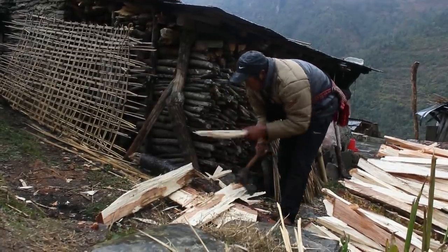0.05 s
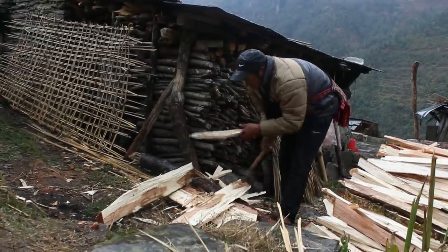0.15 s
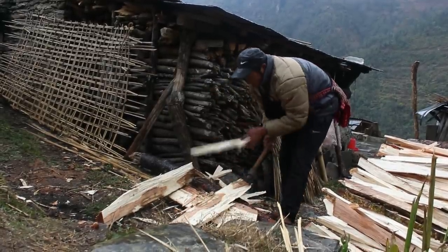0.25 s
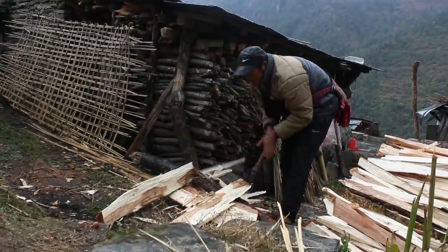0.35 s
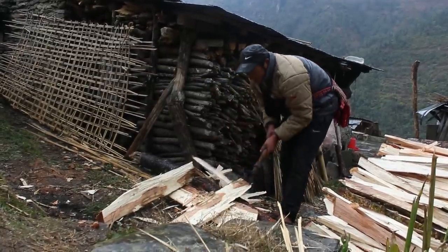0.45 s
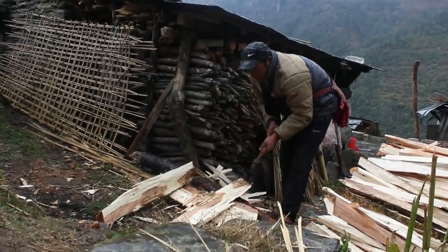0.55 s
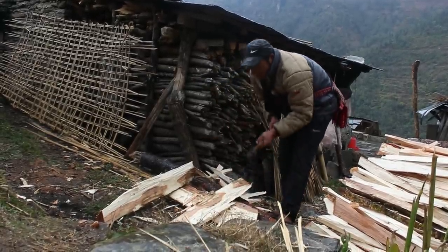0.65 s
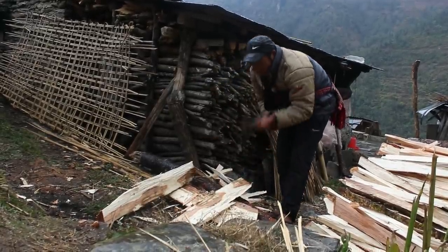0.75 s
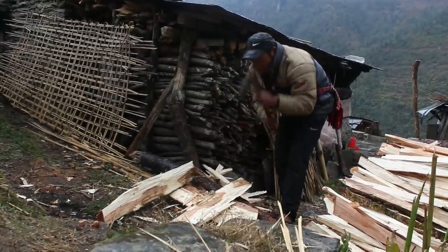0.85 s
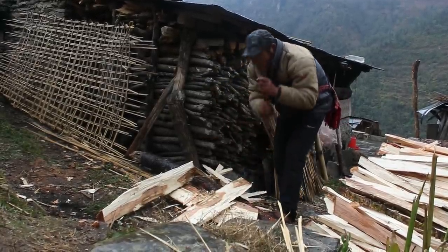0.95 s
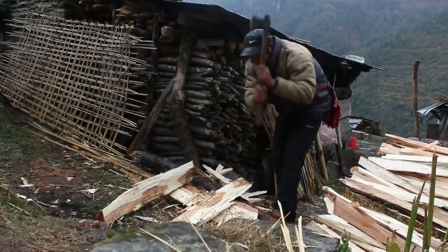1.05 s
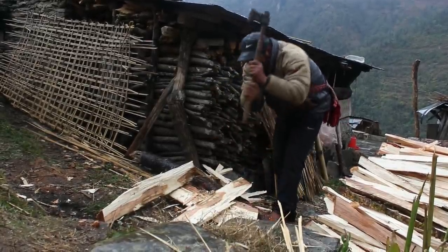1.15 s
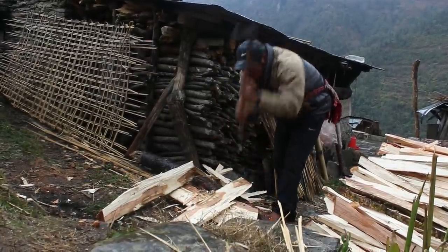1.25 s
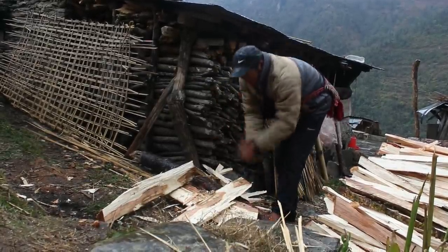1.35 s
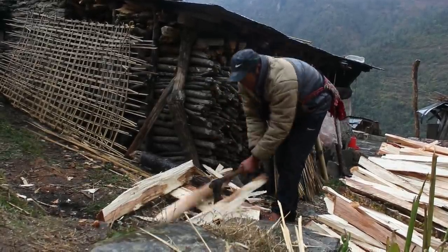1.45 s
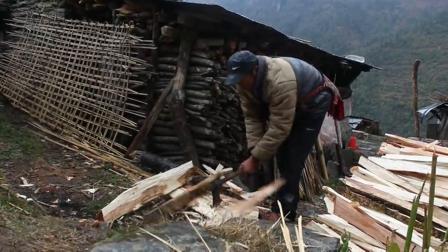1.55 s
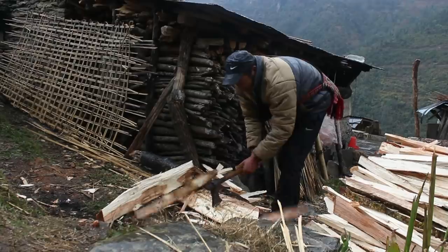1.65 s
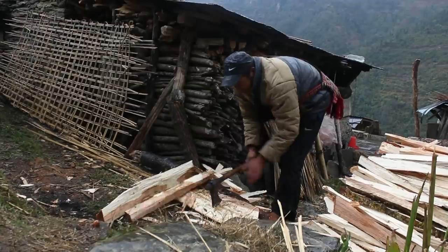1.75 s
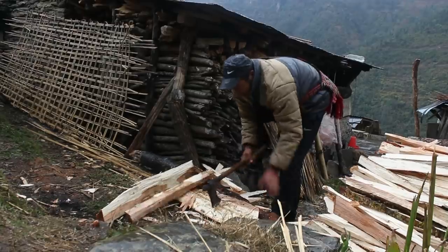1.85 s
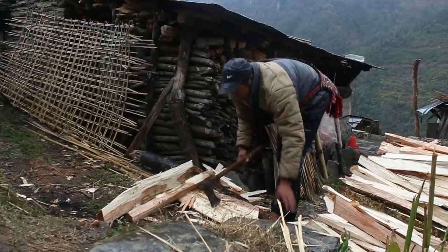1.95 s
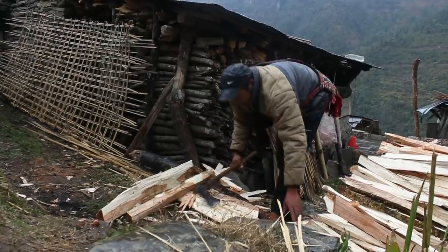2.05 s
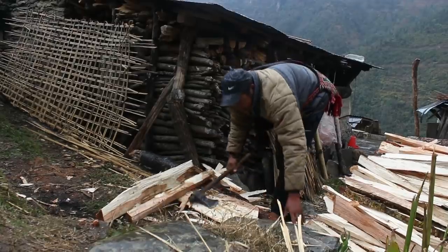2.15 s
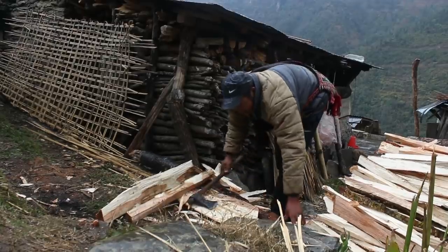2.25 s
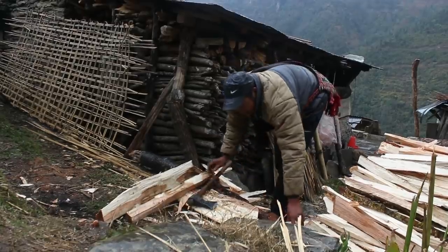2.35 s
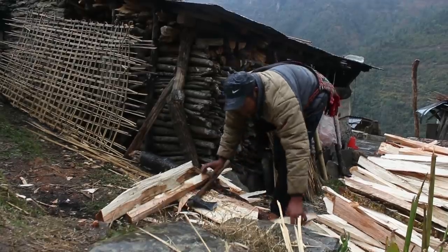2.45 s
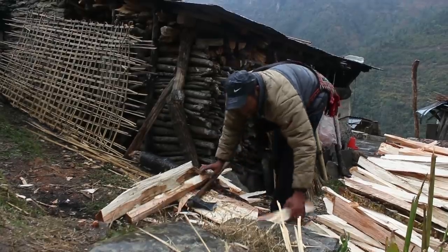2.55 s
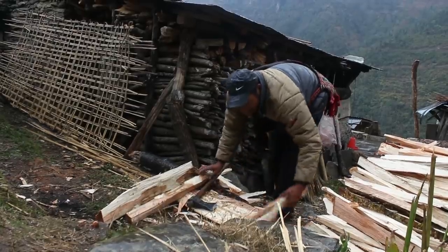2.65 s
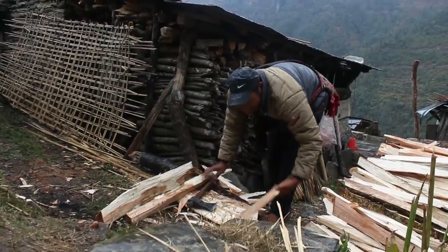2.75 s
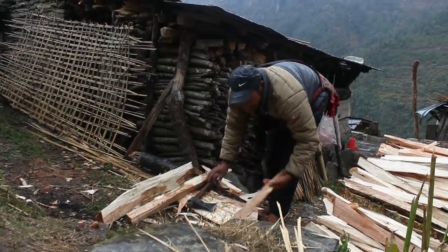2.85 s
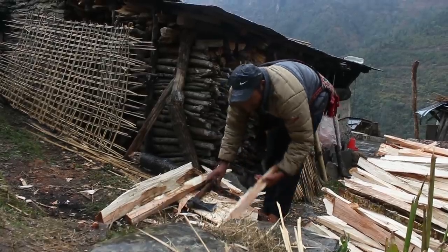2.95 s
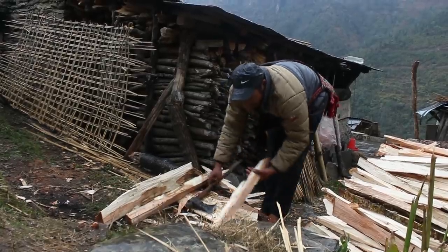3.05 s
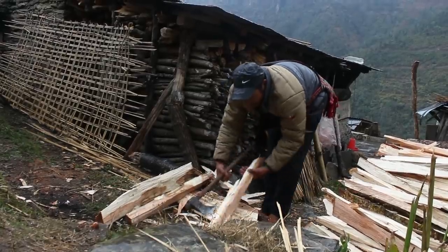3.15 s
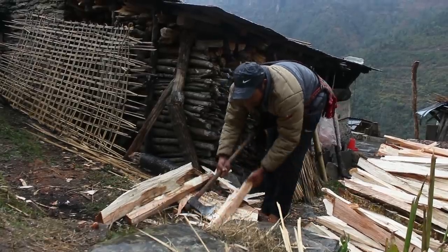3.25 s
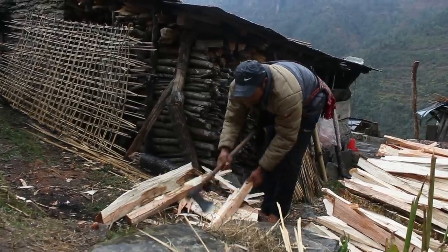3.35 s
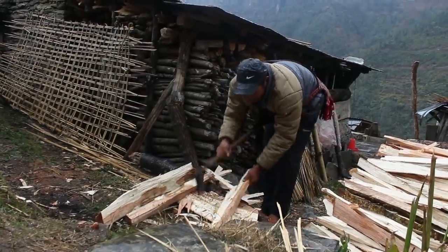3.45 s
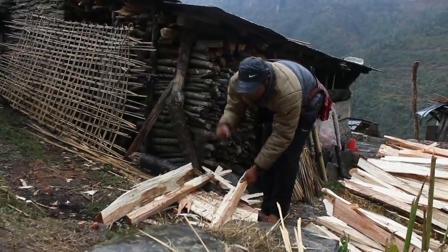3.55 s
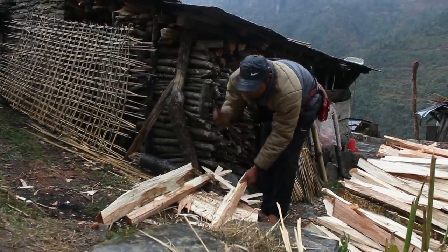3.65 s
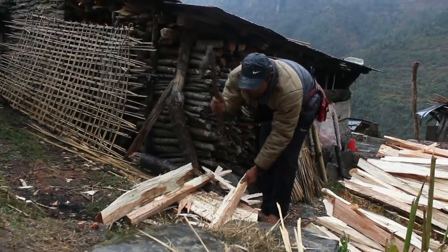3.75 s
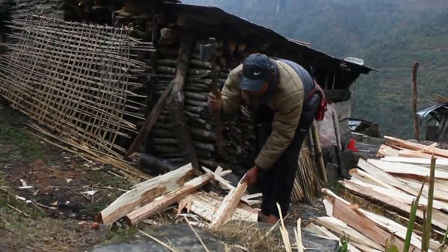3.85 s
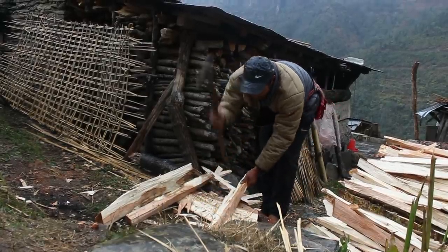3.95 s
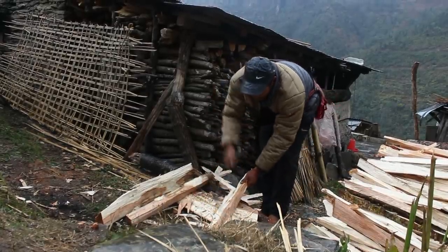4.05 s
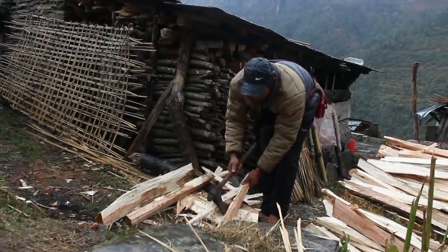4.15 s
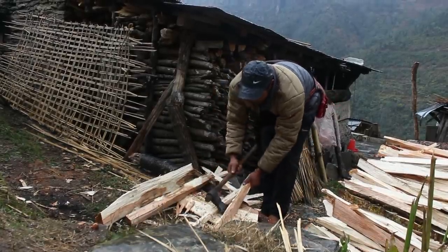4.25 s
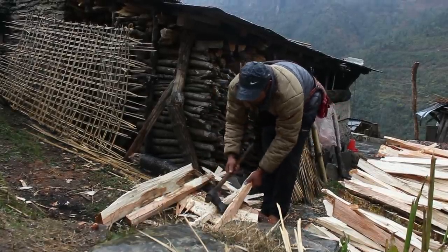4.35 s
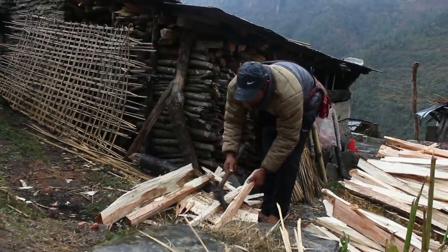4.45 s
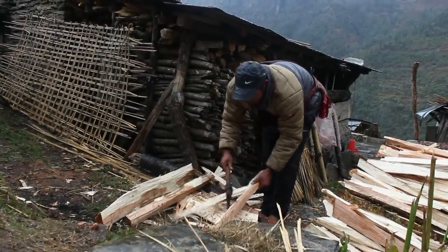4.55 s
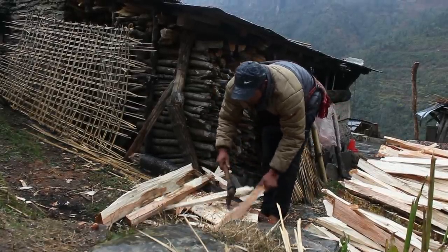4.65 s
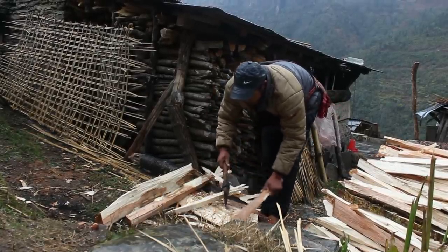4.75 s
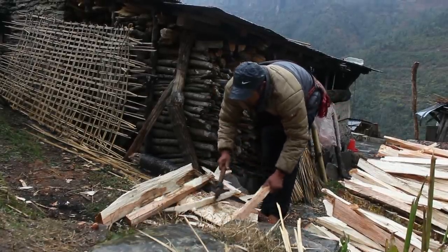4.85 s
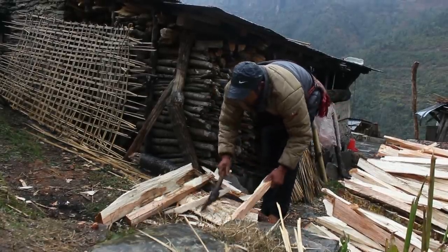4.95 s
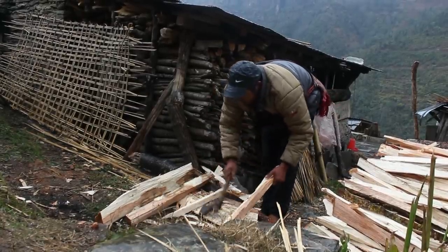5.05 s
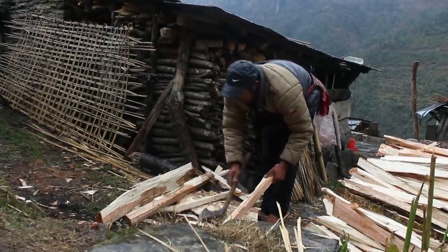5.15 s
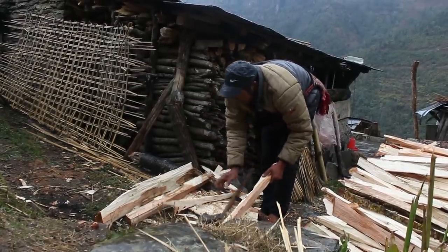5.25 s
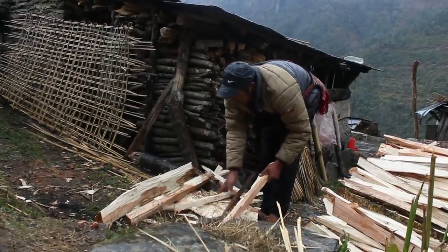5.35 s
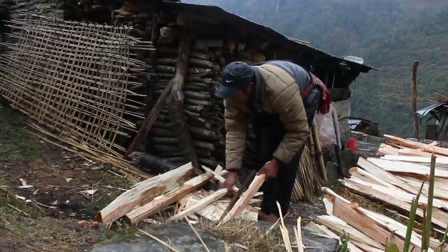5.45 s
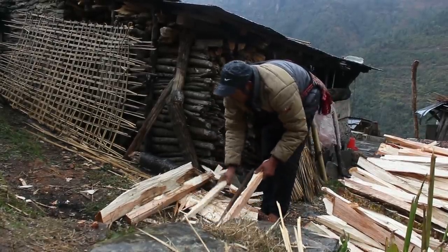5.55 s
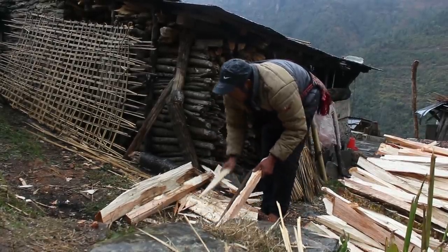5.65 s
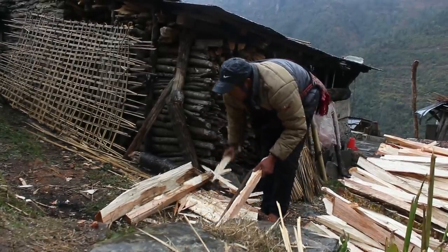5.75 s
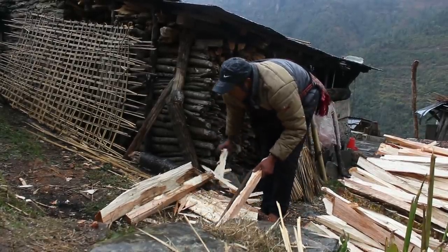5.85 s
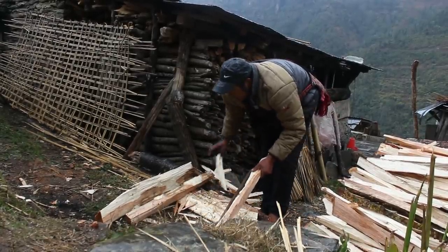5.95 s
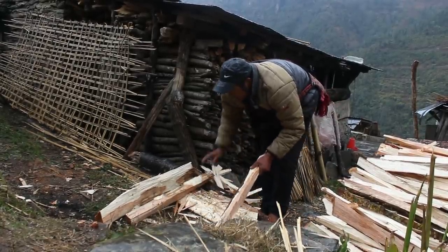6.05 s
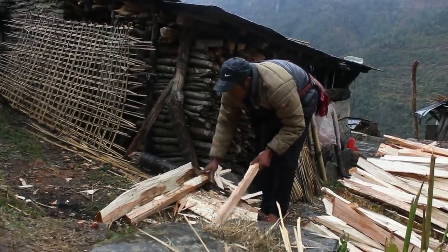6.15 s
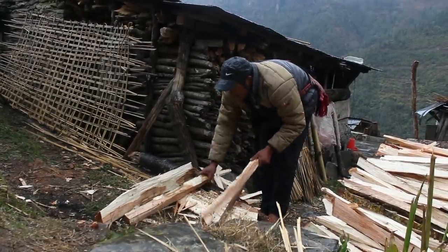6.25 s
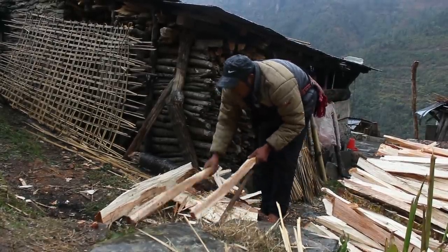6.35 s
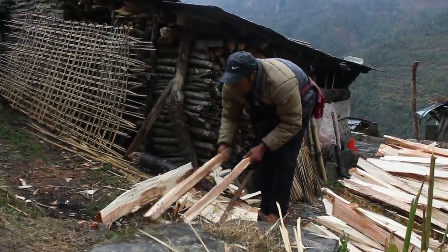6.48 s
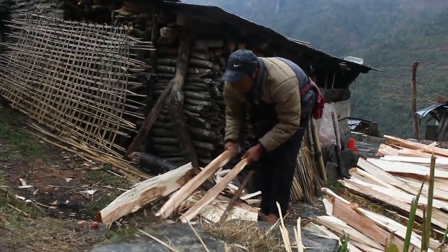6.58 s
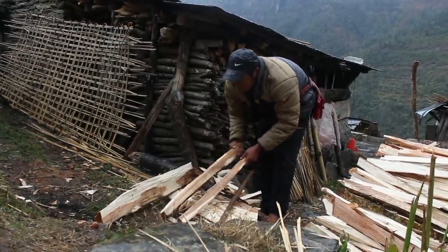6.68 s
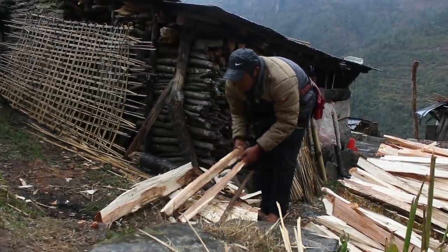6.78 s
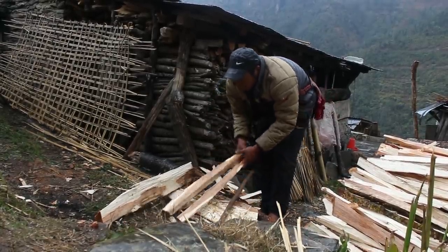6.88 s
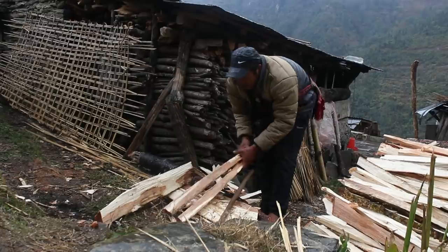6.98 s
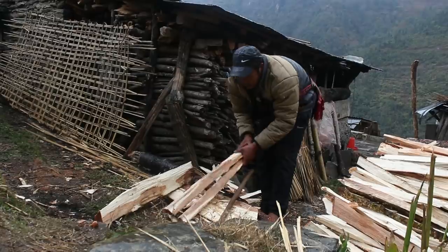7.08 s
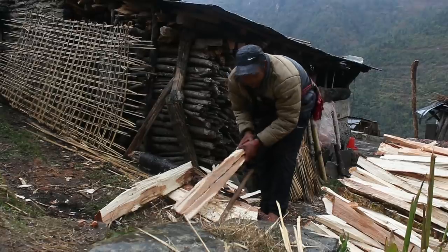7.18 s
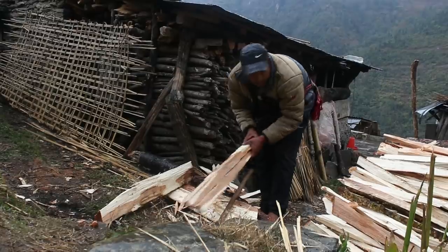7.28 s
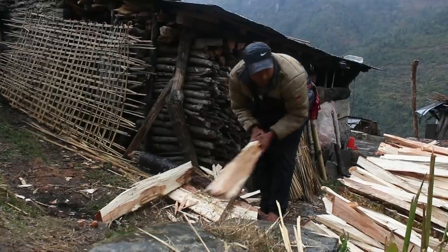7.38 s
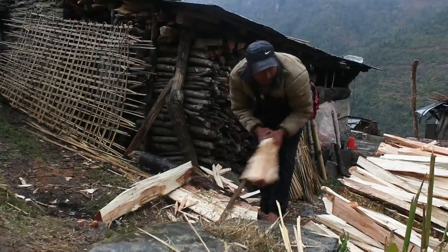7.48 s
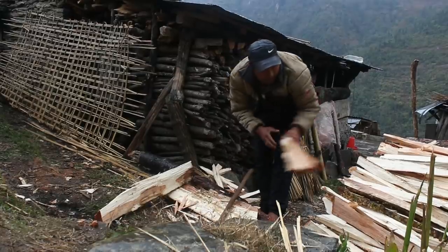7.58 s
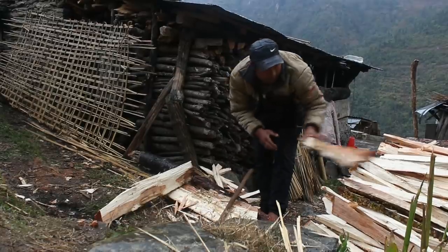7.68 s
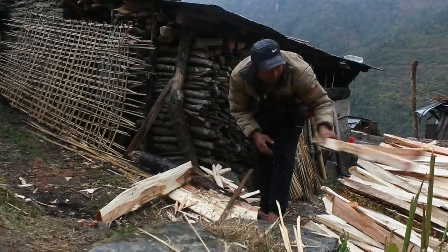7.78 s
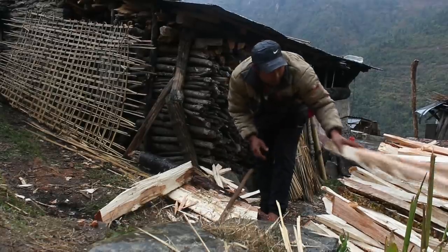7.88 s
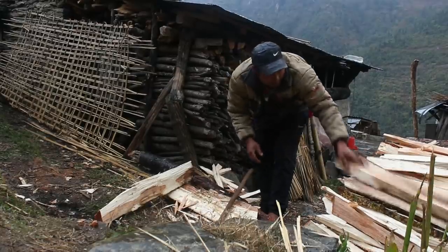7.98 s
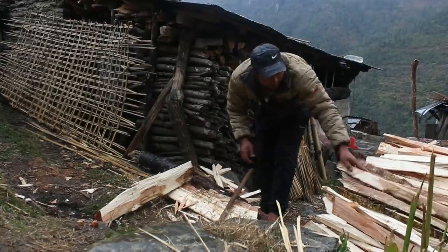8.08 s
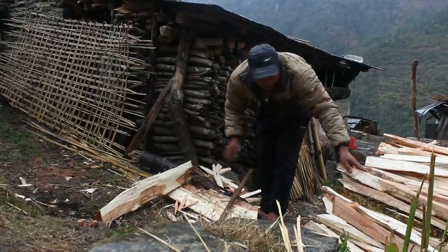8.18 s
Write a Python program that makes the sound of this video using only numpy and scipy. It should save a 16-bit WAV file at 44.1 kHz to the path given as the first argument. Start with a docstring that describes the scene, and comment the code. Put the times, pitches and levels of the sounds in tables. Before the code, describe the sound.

A small axe splits dry firewood outdoors, close and central, with a slight short echo from a shed wall. A dull thud and a few light knocks and snaps fill the first second. At about 1.4 seconds a very loud splitting crack hits, and a piece hums briefly as it flies off and clatters down. A firm chop follows at 2.2, then light taps of handled sticks and a very faint ring of the steel head. A second very loud crack comes at 4.1, fibres snap around 4.6, and another chop lands at 5.2. Sparse, quieter knocks follow, one clearer near 6 seconds. At about 8 seconds sticks clatter onto a pile. Sleeves and bark rustle softly, and occasional dull thuds come from the left. A faint, steady wash of valley noise lies underneath, with a barely audible sinking whistle around 3 seconds.

```python
"""Beside a shed on a hillside, a small axe splits dry firewood; two hard chops clip.
Sticks knock and ring in their wooden modes, fibres snap, a split half hums as it flies off,
the steel head rings faintly, and at the end sticks land on a pile. Sleeves and bark rustle,
dull thuds come from the left, and the shed wall echoes. Under it all lie a far wash of
valley noise, low air movement and, briefly, one faint sinking tone."""
import sys
import numpy as np
from scipy import signal
from scipy.io import wavfile
from scipy.ndimage import uniform_filter1d

SR = 44100
rng = np.random.default_rng(int(sys.argv[2]) if len(sys.argv) > 2 else 0)


def int16_out(signal):
    """Quantize to a 16-bit WAV file."""
    q = np.round(np.clip(np.atleast_2d(signal).T, -1, 1) * 32767)
    wavfile.write(sys.argv[1], SR, q.astype(np.int16))


N = 362502
PILE_FROM_S = 8.0  # wood sounds at the block before this, on the pile after


def amp(db):
    """Decibels to gain."""
    return 10 ** (np.asarray(db) / 20)


def unit_rms(x):
    """Scales to rms 1."""
    return x / np.sqrt(np.mean(x ** 2) + 1e-20)


def unit_peak(x):
    """Scales to peak 1."""
    return x / abs(x).max()


def at_hz(points, hz):
    """Interpolates a curve on a log-frequency axis."""
    points_hz, values = np.transpose(points)
    return np.interp(np.log(hz + 1), np.log(points_hz + 1), values)


def add(mix, start_s, sound):
    """Mixes in a mono or stereo sound."""
    part = mix[..., round(start_s * SR):][..., :sound.shape[-1]]
    part += sound[..., :part.shape[-1]]


def band(x, low_hz, high_hz):
    """Band-pass."""
    return signal.sosfilt(signal.butter(2, [low_hz, high_hz], "band", fs=SR, output="sos"), x)


def ring(modes, t):
    """Sum of decaying sines from rows of pitch_hz, level_db, t60_s."""
    pitch_hz, level_db, t60_s = np.transpose(modes)[:, :, None]
    return (amp(level_db - 60 * t / t60_s) * np.sin(2 * np.pi * pitch_hz * t)).sum(0)


def drift(samples):
    """Smoothed noise, rms 1."""
    return unit_rms(uniform_filter1d(rng.standard_normal(N), size=samples))


# Valley noise spectrum: freq_hz, relative_db
WASH_SPECTRUM = [(18, -44), (30, -70), (100, -5), (364, 0), (1100, -3), (2230, -6), (7090, -20),
                 (14800, -28), (16000, -41)]
# Left-right likeness of the valley noise: freq_hz, coherence
WASH_COHERENCE = [(60, 0.14), (240, 0.51), (950, 0.6), (3770, 0.1), (15000, 0.027)]


def valley_wash():
    """Far steady noise with faint patches drifting in time and frequency."""
    frames, hz = N // 256 + 5, np.fft.rfftfreq(1024, 1 / SR)
    left_re, left_im, other_re, other_im, patches = rng.standard_normal((frames, 513, 5)).T
    patches = uniform_filter1d(patches, size=12, axis=0)
    patches = unit_rms(uniform_filter1d(patches, size=14, axis=1))
    coherence = at_hz(WASH_COHERENCE, hz)[:, None]
    left = left_re + 1j * left_im
    right = coherence * left + np.sqrt(1 - coherence ** 2) * (other_re + 1j * other_im)
    spectra = np.array([left * amp(0.1), right])
    spectra *= amp(at_hz(WASH_SPECTRUM, hz)[:, None] + 1.2 * patches)
    noise = signal.istft(spectra, nperseg=1024, noverlap=768)[1][:, :N]
    return amp(-49.5) * unit_rms(noise)


def air_rumble():
    """Faint low air movement, partly alike left and right."""
    air = rng.standard_normal((2, N))
    return amp(-49) * unit_rms(band(air + 0.18 * air[::-1], 2.9, 41))


# Handling envelope: time_s, level_db
RUSTLE_LEVELS = [(0, -62), (.7, -60), (1., -53), (1.3, -60), (1.85, -52.5), (2.05, -86), (2.4, -51.5),
                 (2.65, -72), (3.25, -53.5), (3.6, -70), (4.5, -63), (4.63, -44), (4.72, -63), (5.28, -52),
                 (5.5, -63.5), (6.5, -60), (7.9, -66.5), (8.1, -51)]


def rustle(ticks_per_s=1200):
    """Handled sleeves, bark and chips give tiny uneven ticks, scattered left and right."""
    sizes = amp(3.35 * np.minimum(rng.exponential(1, (2, N)), 4))
    occurs = rng.random((2, N)) < ticks_per_s / SR
    ticks = sizes * occurs * rng.standard_normal((2, N))
    level_db = np.interp(np.arange(N) / SR, *np.transpose(RUSTLE_LEVELS))
    return amp(level_db) * unit_rms(band(ticks + 0.071 * ticks[::-1], 290, 4900))


# Dull thuds: start_s, level_db, pitch_hz, t60_s
THUD_HITS = [(0.024, -25.5, 159, 0.043), (0.315, -24, 228, 0.058), (0.393, -38, 246, 0.16),
             (1.745, -27.5, 156, 0.059), (1.801, -37.5, 162.5, 0.091), (3.857, -33, 239, 0.061),
             (4.033, -33, 126.5, 0.25), (4.381, -42.5, 160, 0.13), (4.445, -37.5, 176, 0.072),
             (6.814, -35, 172, 0.036), (6.836, -40.5, 124, 0.08), (7.091, -32, 299, 0.035),
             (7.109, -38.5, 196, 0.028), (7.412, -38, 123, 0.017), (7.433, -41.5, 103, 0.14)]


def thuds(glide_s=0.0017, attack_s=0.0055, tap_db=-7.5):
    """A heavy ring that drops quickly to its pitch, two side modes and a short dull tap."""
    out, t = np.zeros(N), np.arange(9000) / SR
    for start_s, level_db, pitch_hz, t60_s in THUD_HITS:
        cycles = pitch_hz * (t + 0.00624 * (1 - np.exp(-t / glide_s)))
        main = amp(-60 * t / t60_s) * np.sin(2 * np.pi * cycles)
        sides = ring([(0.7 * pitch_hz, -10, 2 * t60_s), (2.1 * pitch_hz, -5, 0.68 * t60_s)], t)
        body = unit_peak((main + sides) * np.minimum(t / attack_s, 1))
        tap = unit_peak(band(rng.standard_normal(len(t)) * amp(-60 * t / 0.0053), 290, 1760))
        add(out, start_s, amp(level_db) * (body + amp(tap_db) * tap))
    return out


# Scatter from shed and woodpile: freq_hz, t60_s
SCATTER_DECAY = [(150, 0.28), (500, 0.12), (2000, 0.11), (8000, 0.12)]


def shed_echo(source, wall_s=0.0112, wall_db=-26.5, scatter_db=-10):
    """One reflection off the shed wall, and sparse scatter dying band by band."""
    taps = np.zeros((2, SR // 2))
    slots = np.arange(200, SR // 2 - 20, 20)
    arrivals = slots + rng.integers(0, 20, (2, len(slots)))
    np.put_along_axis(taps, arrivals, rng.choice([-1., 1.], arrivals.shape), 1)
    taps[1] += 1.73 * taps[0]  # both sides share most of the scatter
    hz, t, spectra = signal.stft(taps, SR, nperseg=256)
    decay = amp(-60 * t / at_hz(SCATTER_DECAY, hz)[:, None])
    response = signal.istft(spectra * decay, SR, nperseg=256)[1]
    response *= amp(scatter_db) / np.linalg.norm(response, axis=1)[:, None]
    response[:, round(wall_s * SR)] += amp(wall_db)
    return signal.fftconvolve(source[None], response, axes=1)[:, :N]


def chatter(t60_s):
    """A quickly dying stereo run of uneven tiny impacts."""
    t = np.arange(6000) / SR
    fade = amp(-60 * t / t60_s) * np.minimum(t / 0.0018, 1)
    shared, other, chance = rng.standard_normal((3, len(t)))
    spikes = fade * shared * (0.27 + (abs(chance) > 1.8))
    return np.array([spikes, spikes + 0.19 * fade * other])


def wood_pan(start_s):
    """Stereo gains: the block slightly left, the pile slightly right."""
    left_minus_right_db = 1.3 if start_s < PILE_FROM_S else -0.7
    return amp([[left_minus_right_db / 2], [-left_minus_right_db / 2]])


def focus(modes, centre_hz, db_per_octave, t60_scale):
    """Weakens modes far from a pitch and scales their ring time."""
    pitch_hz, level_db, t60_s = modes.T
    loss_db = db_per_octave * abs(np.log2(pitch_hz / centre_hz))
    return np.column_stack([pitch_hz, level_db - loss_db, t60_s * t60_scale])


# Dry stick modes: pitch_hz, level_db, t60_s
STICK_MODES = [(255, 0, .12), (300, 0, .1), (365, 0, .09), (455, 0, .06), (560, 0, .05), (680, 0, .06),
               (765, 0, .08), (900, 0, .05), (1080, 0, .06), (1250, 0, .045), (1480, -3, .028),
               (1770, 0, .024), (2070, -1, .019), (2330, -2, .016), (2900, -2, .014), (3680, -2, .012)]


def knock(crack_db, crack_hz, body_db, body_hz, chatter_s, ground_db, t60_scale):
    """A shove and a chattering contact ring a stick near two pitches; the ground answers."""
    hits = chatter(chatter_s)
    t = np.arange(hits.shape[1]) / SR
    modes = np.array(STICK_MODES)
    modes[:, 0] *= 1 + 0.038 * rng.standard_normal(len(modes))  # every stick is cut differently

    shove = np.exp(-t / 0.00026) + 1.2 * unit_peak(hits[0])
    body_ring = ring(focus(modes, body_hz, db_per_octave=26, t60_scale=t60_scale), t)
    body_ring += ring([(body_hz, 3, 0.052 * t60_scale)], t)
    body = signal.fftconvolve(shove, body_ring)[:len(t)]
    body = band(band(body, 0.71 * body_hz, 1800), 80, 890)

    pulse = np.hanning(round(0.55 * SR / crack_hz) + 2)  # a low knock is a long soft touch
    contact = signal.fftconvolve(hits + 0.98 * (t == 0), pulse[None])[:, :len(t)]
    crack_ring = ring(focus(modes, crack_hz, db_per_octave=9, t60_scale=0.7), t)
    crack_ring += ring([(crack_hz, 2, 24 / crack_hz)], t)  # dies in 24 cycles
    rung = signal.fftconvolve(contact, crack_ring[None])[:, :len(t)]
    click = unit_peak(band(contact, 0.59 * crack_hz, 3.34 * crack_hz))
    crack = unit_peak(band(rung, 520, 15000)) + 0.62 * click

    ground = ring([(128.6, ground_db, 0.05)], t)
    return amp(body_db) * unit_peak(body) + amp(crack_db) * (unit_peak(crack) + ground)


# Wood strikes, with a sharp repeat about 11 ms after three hard chops:
# start_s, crack_db, crack_hz, body_db, body_hz
KNOCK_HITS = [(0.316, -25, 1000, -26.5, 350), (0.401, -38, 610, -38, 242), (0.463, -12, 2310, -29, 626),
              (0.505, -41, 2170, -40.5, 257), (0.606, -19, 1940, -28, 537), (0.71, -24, 1720, -47, 480),
              (0.822, -42, 900, -47, 370), (0.905, -44, 1590, -43, 358), (1.414, 2, 1710, -2, 429),
              (1.426, -5.5, 1150, -30, 370), (1.558, -33, 1140, -29.5, 265), (1.629, -21.5, 760, -49, 617),
              (1.658, -27, 1910, -32, 212), (1.679, -32, 1890, -31.5, 338), (1.74, -18.5, 1300, -25, 477),
              (1.752, -28, 704, -24, 526), (1.778, -28, 740, -27, 284), (1.805, -32, 770, -37, 272),
              (2.161, -7, 1080, -3.5, 386), (2.173, -15, 736, -30, 365), (2.354, -32.5, 3800, -59, 229),
              (2.381, -32, 3760, -48, 270), (2.411, -37.5, 1090, -50, 592), (2.482, -33.5, 2120, -47, 305),
              (2.535, -28, 1280, -46, 550), (3.145, -38, 850, -31.5, 384), (3.167, -34, 673, -35, 382),
              (3.245, -34.5, 2370, -36.5, 352), (3.326, -27, 694, -36, 365), (3.861, -30.5, 810, -43, 398),
              (4.112, 3.5, 2120, -2, 470), (4.122, -4.5, 673, -12, 343), (4.152, -40, 710, -26, 464),
              (4.257, -26, 696, -30, 362), (4.667, -23.5, 1850, -32, 490), (4.792, -32, 1700, -52, 598),
              (5.017, -32, 660, -30, 374), (5.045, -40, 720, -36, 375), (5.1625, -6, 920, -6.5, 354),
              (5.181, -11, 713, -23, 294), (5.32, -31.5, 690, -27.5, 354), (5.351, -26, 686, -30.5, 310),
              (5.42, -30, 1160, -35, 340), (6.058, -17, 1380, -29.5, 247), (6.38, -30.5, 670, -37.5, 256),
              (6.557, -36.5, 1200, -55, 554), (7.176, -31, 1870, -41, 226), (8.026, -23.5, 1840, -40, 470),
              (8.03, -32, 613, -22.5, 616), (8.041, -8.5, 1570, -43, 450), (8.047, -3.5, 2310, -25, 598),
              (8.057, -21, 1140, -33, 533), (8.064, -18, 1130, -24, 487), (8.087, -19, 1910, -29.5, 210),
              (8.104, -25.5, 1050, -50, 460), (8.165, -26.5, 1800, -26.5, 768),
              (8.174, -31, 1700, -24.5, 813), (8.193, -25.5, 2310, -46, 810)]


def wood_knocks():
    """Chops and knocks, plus the hard taps on two of the dull thuds."""
    out = np.zeros((2, N))
    for start_s, *hit in KNOCK_HITS:
        if start_s < PILE_FROM_S:
            sound = knock(*hit, chatter_s=0.034, ground_db=-18.5, t60_scale=1)
        else:  # on the pile the ground is far and loose sticks ring freely
            sound = knock(*hit, chatter_s=0.054, ground_db=-31, t60_scale=1.43)
        add(out, start_s, sound * wood_pan(start_s))
    return out


# Fibres and splinters: start_s, level_db, centre_hz
FIBRE_SNAPS = [(0.387, -34, 3350), (0.401, -28.5, 4150), (0.4517, -32, 3840), (0.4634, -16.5, 2730),
               (0.472, -25, 2900), (0.59, -22, 4750), (0.602, -20.5, 3280), (1.4141, -4.5, 3050),
               (1.581, -35.5, 3650), (1.627, -33, 2760), (1.6577, -17.5, 2480), (1.778, -31.5, 4180),
               (1.806, -32, 2450), (2.161, -22, 2480), (2.46, -39.5, 2780), (2.533, -34, 2630),
               (2.759, -42, 2860), (2.812, -37, 3120), (3.236, -33, 2770), (3.324, -29.5, 3330),
               (4.1108, -6.5, 3540), (4.121, -9, 2700), (4.1516, -20.5, 4940), (4.257, -34.5, 3640),
               (4.342, -30, 7800), (4.4054, -39, 3780), (4.4852, -38.5, 3550), (4.5613, -30, 2840),
               (4.601, -27.5, 4770), (4.609, -29, 4160), (4.635, -30.5, 4330), (4.6543, -21.5, 2820),
               (4.6689, -15.5, 2780), (4.725, -35.5, 2880), (4.789, -35.5, 3230), (5.163, -30.5, 2370),
               (5.232, -39, 2200), (5.2547, -32, 3360), (5.305, -32.5, 3480), (5.552, -30, 2570),
               (5.837, -37, 6950), (6.046, -31, 2940), (6.0595, -21.5, 3820), (6.6, -39.5, 4000),
               (6.823, -37, 2650), (6.905, -39, 3160), (7.177, -29, 3100), (7.324, -39.5, 3100),
               (7.787, -38.5, 3130), (7.839, -46, 2020), (7.887, -41.5, 3000), (8.0318, -19.5, 2760),
               (8.049, -18, 2670), (8.068, -24, 2770), (8.085, -29, 2640), (8.168, -36, 2920),
               (8.192, -39, 2730)]


def fibre_snaps():
    """Snapping fibres give bright sprays of clicks, longer on the pile."""
    out = np.zeros((2, N))
    for start_s, level_db, centre_hz in FIBRE_SNAPS:
        hits = chatter(t60_s=0.036 if start_s < PILE_FROM_S else 0.098)
        spray = band(hits, 0.47 * centre_hz, 1.323 * centre_hz) + 0.22 * band(hits, centre_hz, 8240)
        add(out, start_s, amp(level_db) * unit_peak(spray) * wood_pan(start_s))
    return out


# Bending modes of the split half: pitch_hz, level_db
BENDING_MODES = [(248, -25), (280, -32)]


def flying_half(start_s=1.415, peak_s=1.54, rise_s=0.07, fall_s=0.065):
    """Two close modes beat, swelling and fading as the split half flies off."""
    t = np.arange(N) / SR
    width_s = np.where(t < peak_s, rise_s, fall_s)
    swell = (t > start_s) * np.exp(-((t - peak_s) / width_s) ** 2)
    hum = sum(amp(db) * np.sin(2 * np.pi * hz * (t - 1.52)) for hz, db in BENDING_MODES)
    return amp(-6) * swell * hum


# Steel head modes: pitch_hz, level_db, t60_s
HEAD_MODES = [(3316, -3, .35), (4430, 0, .42), (4490, -6, .25), (9700, -13, .15)]
# Touches on the head: start_s, level_db, top_mode_lift_db
HEAD_TOUCHES = [(2.162, -48, -8), (2.254, -55, -8), (3.103, -52, -4), (3.165, -60, 0), (3.325, -55, 14),
                (4.90, -52, -2), (4.95, -59, 0)]


def axe_head():
    """The steel rings after each touch, damped unevenly by the grip."""
    out, t = np.zeros(N), np.arange(20000) / SR
    for start_s, level_db, top_mode_lift_db in HEAD_TOUCHES:
        modes = np.array(HEAD_MODES)
        modes[-1, 1] += top_mode_lift_db
        add(out, start_s, amp(level_db) * ring(modes, t))
    grip_db = 3.5 * drift(samples=300) - 2
    return out * amp(grip_db)


def far_tone(start_s=2.74, length_s=0.71, fade_s=0.08, pitch_hz=2060, sink_hz_per_s=400):
    """A thin whistle that wavers and sinks, just above the wash."""
    t = np.arange(N) / SR - start_s
    waver_hz = 22 * drift(samples=900)
    cycles = np.cumsum(pitch_hz - sink_hz_per_s * t + waver_hz) / SR
    fade = np.clip(np.minimum(t, length_s - t) / fade_s, 0, 1)
    level_db = -63 + 5 * drift(samples=1500)
    return amp(level_db) * fade * np.sin(2 * np.pi * cycles)


def scene():
    """Work in the middle; thuds from the left reach the right channel later and weaker."""
    wood = wood_knocks() + fibre_snaps()
    ringing = flying_half() + axe_head()
    thud = thuds()
    left_thuds = np.array([thud * amp(11.5), np.roll(thud, round(0.00164 * SR)) * amp(3.5)])
    direct = wood + ringing + rustle() + left_thuds
    echo = shed_echo(wood.mean(0) + ringing + thud)
    return direct + echo + valley_wash() + air_rumble() + far_tone()


def record(dry, threshold_db=-16, release_db_per_s=120, cutoff_hz=16000):
    """The microphone drops deep bass; gain dips after the hardest chops; clipping, then low-pass."""
    heard = signal.sosfilt(signal.butter(3, 110, "high", fs=SR, output="sos"), dry)
    power = uniform_filter1d((heard ** 2).mean(0), size=300)
    power_db = 10 * np.log10(abs(power) + 1e-12)
    release_db = release_db_per_s * np.arange(N) / SR
    held_db = np.maximum.accumulate(power_db + release_db) - release_db
    over_db = np.maximum(held_db - threshold_db, 0)
    dip_db = 0.9 * uniform_filter1d(over_db, size=1201, origin=600)  # 27 ms attack lets peaks through
    clipped = np.clip(heard / amp(dip_db), -1, 1)
    low_pass = signal.firwin(511, cutoff_hz, window=("kaiser", 9), fs=SR)
    return signal.oaconvolve(clipped, low_pass[None], "same")


dry = scene()
out = record(dry)
int16_out(out)
```